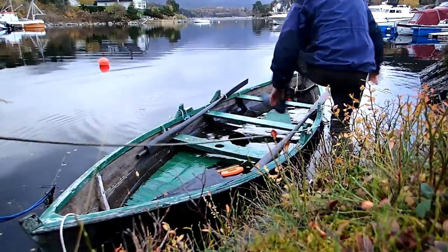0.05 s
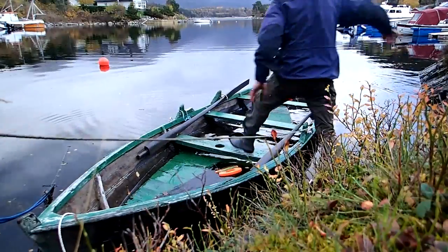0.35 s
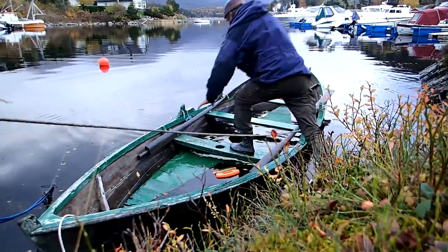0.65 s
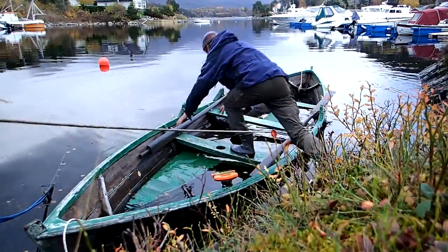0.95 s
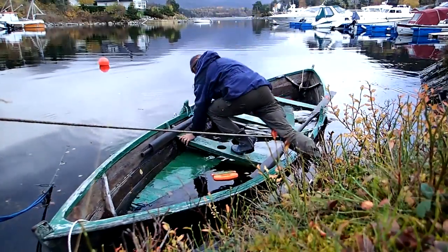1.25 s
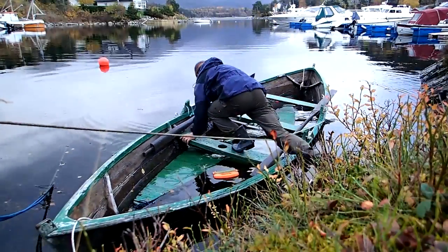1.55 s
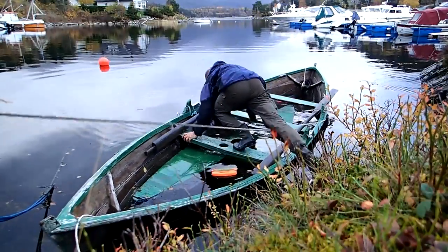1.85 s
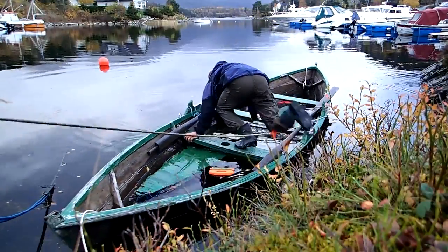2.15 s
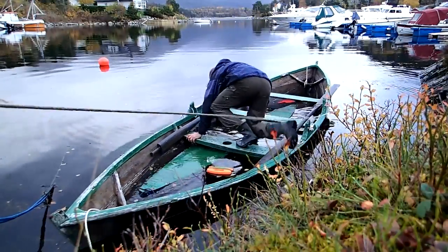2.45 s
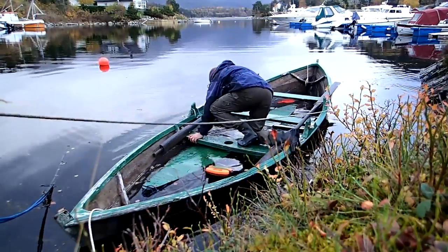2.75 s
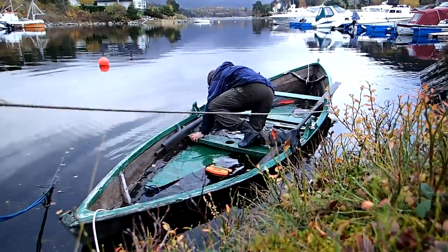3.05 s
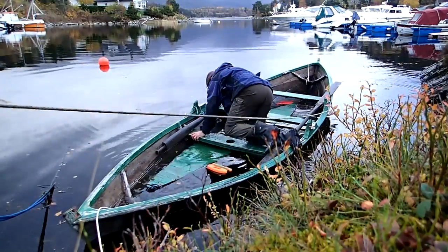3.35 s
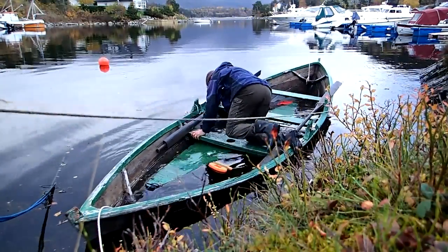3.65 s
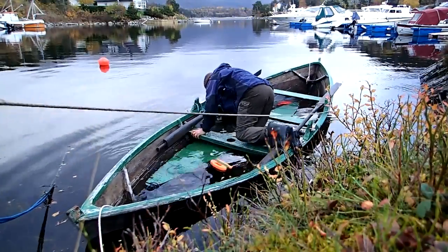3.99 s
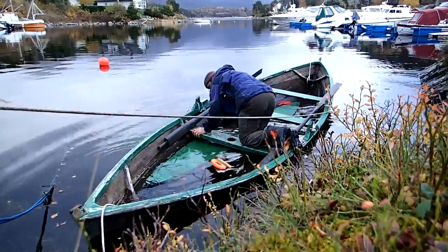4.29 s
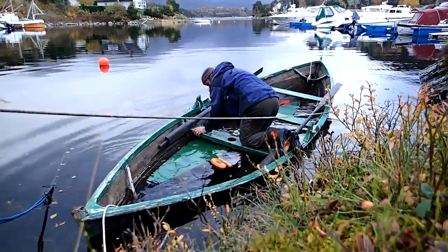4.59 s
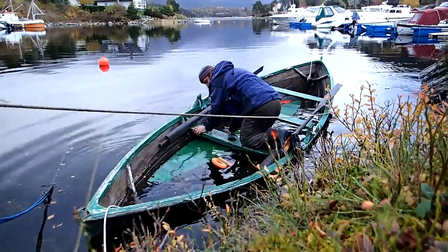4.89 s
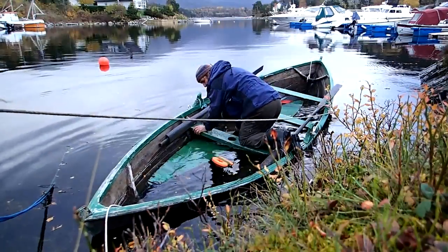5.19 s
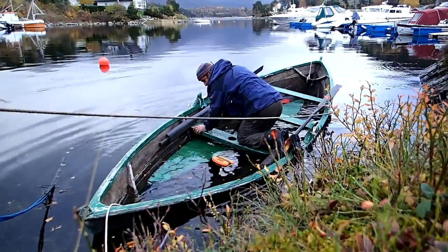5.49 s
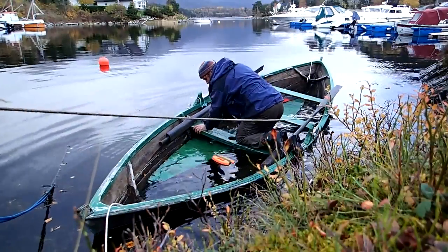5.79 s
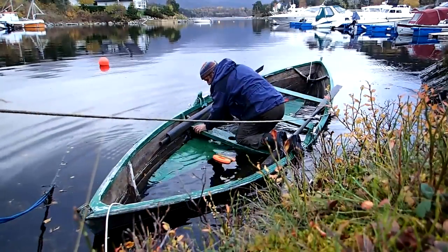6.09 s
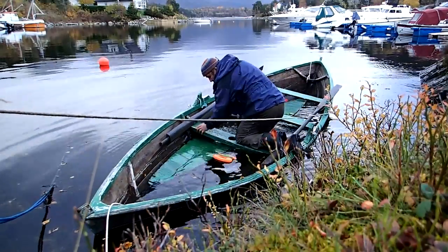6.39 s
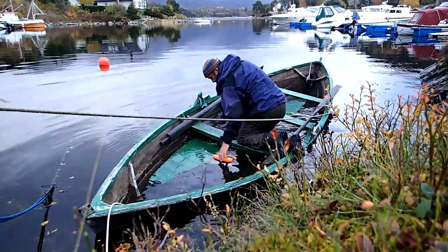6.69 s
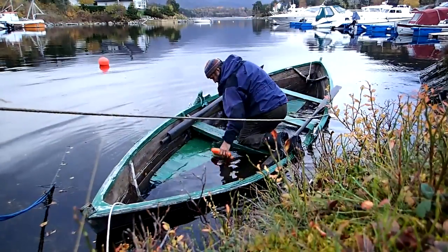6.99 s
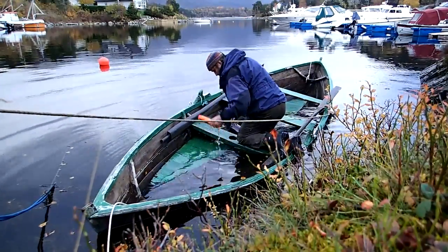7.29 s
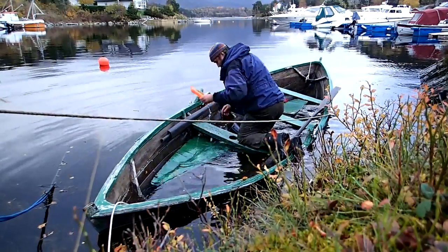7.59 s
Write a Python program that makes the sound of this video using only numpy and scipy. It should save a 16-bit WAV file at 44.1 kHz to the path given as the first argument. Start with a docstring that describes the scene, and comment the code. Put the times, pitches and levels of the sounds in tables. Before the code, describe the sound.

Someone climbs into a small wooden boat on calm water. Boots thump hollowly on the planks while a jacket and grass rustle, and water briefly splashes. More knocks, rubs and short rubber squeaks lead to one heavy, rattling thump. Water then sloshes and gurgles in the bottom of the boat, and a bailer scoops it up with splashes and drips. The sounds are fairly close, outdoors, over light wind.

```python
"""On calm water by a grassy bank, someone climbs into a small wooden boat and kneels on a seat.
Boots and knees thump the planks and make them ring; rubber soles rub and squeak; jacket and grass
rustle. The rocking sloshes the water in the bottom of the boat, where trapped bubbles ring and
gurgle, then a bailer scoops it up and drips. Light wind, a far hush and a faint whistle lie behind."""
import sys
import numpy as np
from scipy import signal
from scipy.fft import rfft, irfft, next_fast_len
from scipy.io import wavfile
from scipy.ndimage import uniform_filter1d

SR = 44100
rng = np.random.default_rng(int(sys.argv[2]) if len(sys.argv) > 2 else 0)


def bounce(signal):
    """Save signal as a 16-bit WAV file at the path given by the first command-line argument."""
    frames = np.transpose(np.atleast_2d(signal))
    limited = np.clip(frames, -1, 1)
    pcm = np.round(limited * 32767).astype(np.int16)
    wavfile.write(sys.argv[1], SR, pcm)


N = 341334
TIME = np.arange(N) / SR

# tone of the outdoor hush: pitch_hz, level_db
HUSH_SPECTRUM = [(25, -30), (40, -11.5), (62, -4), (100, 1), (200, 0.5), (400, -4), (900, -7),
                 (1800, -13.5), (3500, -22), (7000, -24.5), (12000, -21.5), (16000, -26.5)]
# how alike the hush is in both ears: pitch_hz, likeness (0 to 1)
HUSH_LIKENESS = [(40, 0.87), (200, 0.28), (700, 0.34), (2500, 0.25), (5000, 0.68), (8000, 0.065),
                 (15000, 0.061)]
# a far, low drone: time_s, level_db
DRONE_LEVELS = [(0.0, -73), (2.0, -76), (4.4, -69), (6.2, -56), (7.74, -59)]
# movements that stir jacket and grass: peak_s, build_s, fade_s, level_db
BODY_MOVES = [(.02, 0.088, 1.0, -52), (.8, 0.7, 0.54, -51.5), (1.25, 0.38, 0.3, -59.5),
              (1.62, 0.62, 0.41, -53.5), (1.82, 0.27, 0.17, -54.5), (2.68, 0.17, 0.22, -50),
              (3.12, 0.17, 0.21, -58.5), (3.45, 0.5, 0.6, -56.5), (4.0, 0.77, 0.43, -64),
              (4.63, 0.09, 0.28, -60), (5.3, 0.16, 0.69, -49.5), (5.82, .3, 0.44, -60),
              (6.62, 0.15, 0.93, -54), (7.4, 0.79, 1.4, -55)]
# tone of the rustle: pitch_hz, level_db
RUSTLE_SPECTRUM = [(500, -14), (1200, -5.5), (2500, -0.5), (5000, -3.5), (7500, -11), (11500, -13.5),
                   (15000, -27)]
# brushes of jacket and trousers: start_s, length_s, level_db, lowest_hz
CLOTH_SWISHES = [(.005, 0.051, -51, 1500), (2.09, 0.38, -58.5, 3400), (2.66, 0.064, -48.5, 3870),
                 (2.72, 0.033, -51.5, 3870), (3.515, .04, -51.5, 2980), (4.11, 0.031, -51, 3500),
                 (4.705, 0.043, -59, 2500)]
# blows on the hull: start_s, level_db, brightness_hz, settle_s, rebound_count
HULL_BLOWS = [(.008, -32, 1660, 0.048, 0), (0.034, -25, 285, 0.089, 0), (.096, -30, 261, .11, 0),
              (.182, -35.5, 330, 0.16, 1), (.327, -42.5, 2010, 0.035, 0), (0.76, -37, 352, 0.22, 0),
              (0.833, -32.5, 237, 0.16, 0), (1.325, -45, 300, .33, 0), (2.377, -39, 1800, 0.09, 0),
              (2.545, -41, 905, 0.12, 3), (2.928, -36, 646, 0.12, 0), (3.05, -45, 306, 0.048, 0),
              (3.352, -21.5, 3460, 0.078, 0), (3.357, -20, 1900, 0.079, 0), (3.368, -26, 465, 0.23, 3),
              (4.893, -44.5, 300, 0.033, 0)]
# notes the planks ring at: pitch_hz, width_hz, level_db
PLANK_RESONANCES = [(149, 35, 0.5), (202.8, 14.3, 2.5), (275, 67, -1), (390, 74, -5), (465, 35, -2.5),
                    (603, 98, -9.5), (806, 310, -10.5), (1060, 150, -6), (1226, 210, -8.5), (1666, 46, -9),
                    (1826, 140, -12.5), (2530, 1900, -20)]
# boots and hands rubbing on wood: start_s, length_s, level_db, scratch_db (compared with the rub)
WOOD_RUBS = [(0.041, 0.005, -29.5, -10.5), (2.426, 0.084, -46, -5.5), (2.566, 0.083, -49.5, -3),
             (2.927, 0.048, -49, 17), (3.091, 0.026, -47, -1), (4.515, 0.037, -47.5, -12),
             (4.543, 0.043, -44, -11), (4.667, 0.047, -34.5, -25), (4.708, 0.048, -43.5, -6)]
# notes the seat rings at: pitch_hz, width_hz, level_db
SEAT_RESONANCES = [(500, 340, -5.5), (590, 148, 3.5), (840, 66, 4), (1010, 67, 2), (1300, 50, -4.5),
                   (1790, 290, -10.5), (2310, 180, -26)]
# ticks of drops and stems: start_s, crack_db, ring_hz, ring_db (compared with the crack)
SHARP_TICKS = [(.5002, -62, 2750, 16), (.8768, -57.5, 3730, 3.5), (.9352, -55.5, 3600, 6),
               (1.064, -58, 3950, 7.5), (1.221, -58, 2150, -3), (1.398, -69, 1590, 29),
               (1.44, -63, 3730, 8), (1.492, -48, 1520, 4), (1.509, -48, 3970, 4.5),
               (1.5912, -51, 2700, -1), (1.6126, -49, 3500, -14), (3.5208, -61, 3840, 6),
               (3.851, -65.5, 2780, 16), (4.205, -55, 2760, -37), (4.9182, -63, 1380, -5),
               (5.3037, -57.5, 2040, 9.5), (5.5741, -59, 1970, 7), (5.6485, -56.5, 3400, -2),
               (6.1861, -59, 2640, 9.5), (6.2077, -52, 1650, -2), (6.5903, -55.5, 1520, 4),
               (6.6786, -54.5, 3120, -2), (6.85, -68.5, 1890, 21), (6.9675, -66.5, 2250, 20.5),
               (7.2632, -60.5, 3140, 17), (7.375, -50, 1760, -3), (7.445, -47.5, 2550, 0.5),
               (7.4841, -51, 3590, 5), (7.5472, -56.5, 3600, 7), (7.604, -56.5, 3100, 11.5),
               (7.6662, -52, 3000, 1.5), (7.6963, -42, 2300, 0)]
# a thin whistle far away: start_s, length_s, level_db
WHISTLE_SWELLS = [(.55, 0.99, -65), (3.05, 1, -64)]
# the loudest bubbles and tinkling drops: start_s, pitch_hz, level_db
LOUD_BUBBLES = [(1.417, 940, -36.5), (1.487, 940, -29.5), (1.709, 2120, -34), (5.155, 837, -37.5),
                (5.445, 1126, -35.5), (5.608, 613, -32), (5.61, 270, -28), (5.708, 837, -33),
                (5.787, 902, -28), (5.895, 995, -34), (5.93, 2000, -34.5), (6.012, 800, -33.5),
                (6.198, 1490, -32), (6.232, 1940, -34), (6.252, 236, -26), (6.258, 788, -34),
                (6.287, 2240, -31.5), (6.543, 850, -27.5), (6.605, 300, -29.5), (6.715, 2200, -32.5),
                (7.062, 11700, -33), (7.091, 12100, -27), (7.424, 306, -28)]
# surges as the boat rocks and the bailer scoops: peak_s, build_s, fade_s, bubbling_db, spray_db
WATER_SURGES = [(1.5, 0.04, .2, -48, -54), (1.58, 0.17, 0.32, -42.5, -55), (1.71, 0.047, 1, -50, -53.5),
                (5.31, 0.26, 1, -46.5, -56.5), (5.62, .15, 0.13, -47.5, -69), (5.81, 0.31, 0.2, -45.5, -51),
                (6.04, 0.16, 0.095, -44, -56.5), (6.259, .15, 0.074, -41, -46.5),
                (6.535, .05, 0.12, -40.5, -52), (6.72, 0.053, 0.076, -43, -51.5),
                (6.86, 0.046, .2, -49, -52), (6.97, .12, 0.57, -57, -49), (7.11, 0.05, 0.23, -48, -55),
                (7.28, 0.038, 0.31, -49.5, -47.5), (7.43, 0.12, 0.59, -58, -51.5),
                (7.7, .05, 0.24, -52, -50)]
# how loud a bubble is at each pitch: pitch_hz, level_db
BUBBLE_LEVELS = [(220, 7.5), (500, -4), (900, 6), (1800, 5), (3000, 4.5), (5000, -7.5)]
# the same for the tiny bubbles of the spray: pitch_hz, level_db
SPRAY_LEVELS = [(2500, -6), (4000, 5.5), (6500, 0.5), (9500, -3), (12400, 8), (15000, -38)]
# tone of the water's fizz: pitch_hz, level_db
FIZZ_SPECTRUM = [(300, 6), (900, -11), (2500, 5.5), (5000, -1.5), (8000, -7), (12500, -4.5), (15000, -15)]
# short noisy bursts (slaps of water, and a swish just before the heavy thump):
# start_s, length_s, level_db, lowest_hz
NOISY_BURSTS = [(1.485, 0.03, -40.5, 900), (1.612, 0.013, -46, 2500), (3.345, 0.027, -42.5, 2360),
                (5.24, 0.054, -52, 1500), (5.303, 0.016, -43.5, 1790), (6.227, 0.019, -45.5, 1500),
                (6.243, 0.042, -43.5, 218), (6.51, .05, -45, 400), (6.995, 0.091, -52, 2200),
                (7.093, 0.032, -43, 1500), (7.252, 0.023, -43, 1990), (7.523, .022, -42.5, 1800)]
# wet rubber squeaks, one list of points each: time_s, pitch_hz, level_db
SQUEAK_PATHS = [
    [(2.07, 936, -52), (2.11, 1120, -51), (2.16, 2180, -58)],
    [(3.38, 1050, -46), (3.395, 1490, -43), (3.408, 1770, -45), (3.424, 2150, -58)],
]
# pitches the microphone boosts or weakens: pitch_hz, width_hz, gain_db
MICROPHONE_BANDS = [(4043, 107, -18.5), (4940, 1290, 13.5), (6290, 125, 5), (12600, 700, -3)]


def from_db(db):
    """Turn decibels into a number to multiply by."""
    return 10 ** (np.asarray(db) / 20)


def rms_one(x):
    """Scale a sound so that its average strength (rms) is 1."""
    return x / np.sqrt(np.mean(x ** 2) + 1e-20)


def in_time(rows):
    """Join timed points with straight lines, one curve per column."""
    times, *columns = np.transpose(rows)
    return [np.interp(TIME, times, column) for column in columns]


def at_hz(points, hz):
    """Read a table between its listed pitches."""
    pitches, values = np.transpose(points)
    return np.interp(np.log(hz + 1e-9), np.log(pitches), values)


def coloured(x, spectrum):
    """Give a steady sound a tone, at strength 1."""
    size = next_fast_len(N)
    gains = from_db(at_hz(spectrum, np.fft.rfftfreq(size, 1 / SR)))
    return rms_one(irfft(rfft(x, size) * gains, size)[..., :N])


def keep_side(x, hz, side, order=2):
    """Keep the "low" or "high" side of a pitch."""
    return signal.lfilter(*signal.butter(order, min(hz, SR / 2 - 1), side, fs=SR), x)


def resonate(x, resonances):
    """Make a sound ring at several pitches, added with alternating signs."""
    out = 0
    for k, (hz, width, db) in enumerate(resonances):
        r = np.exp(-np.pi * width / SR)
        ring = signal.lfilter([1, 0, -1], [1, -2 * r * np.cos(2 * np.pi * hz / SR), r * r], x)
        out = out + (-1) ** k * from_db(db) * (1 - r * r) / 2 * ring
    return out


def drift(per_s):
    """A random wander of strength 1."""
    points = rng.standard_normal(4096)
    return rms_one(np.interp(TIME * per_s, np.arange(len(points)), points))


def dying(t, fade_s):
    """A fade that drops 60 dB every fade_s."""
    return np.exp(-np.log(1000) * t / fade_s)


def stroke(t, length):
    """A swell that rises fast and falls slowly."""
    return np.sin(np.pi * np.sqrt(np.clip(t / length, 0, 1)))


def swells(peaks, builds, fades, levels_db):
    """A loudness curve: each swell rises 20 dB in its build time and drops 20 dB in its fade time."""
    power, t = 1e-12, TIME[::32]
    for peak, build, fade, db in zip(peaks, builds, fades, levels_db):
        away = np.minimum(np.maximum((peak - t) / build, (t - peak) / fade), 10)
        power = power + from_db(db - 20 * away) ** 2
    return np.interp(TIME, t, np.sqrt(power))


def add(out, start_s, sound):
    """Mix a sound in at its start time."""
    i = int(np.clip(start_s * SR, 0, N - 1))
    out[i:i + len(sound)] += sound[:N - i]


def even_out(x, samples):
    """Hold a sound's running level steady."""
    return x / np.sqrt(np.abs(uniform_filter1d(x ** 2, size=samples)) + 1e-6)


def crackle(spectrum, per_s, spread_db, flutter_db):
    """Tiny random clicks in nine pitch bands; each band flickers by itself."""
    out = 0
    for hz in np.geomspace(400, 14000, num=9):
        sizes = from_db(spread_db * np.minimum(rng.exponential(1, N), 4)) * rng.choice([-1, 1], N)
        clicks = even_out(sizes * (rng.random(N) < per_s / SR), samples=4000)
        band = rms_one(resonate(clicks, [(hz, hz / 2, 0)]))
        out = out + np.sqrt(hz) * band * from_db(flutter_db * drift(60))
    return coloured(out, spectrum)


def bursts(rows, roughness_db, top_hz):
    """Short swells of grainy noise."""
    out, t = np.zeros(N), TIME[:SR // 3]
    for start, length, db, low_hz in rows:
        sizes = from_db(roughness_db * np.clip(rng.standard_normal(len(t)), -2, 2))
        burst = rng.standard_normal(len(t)) * sizes * stroke(t, length)
        sound = keep_side(keep_side(burst, low_hz, "high"), top_hz, "low", order=1)
        add(out, start, from_db(db) * sound / np.sqrt(np.sum(sound ** 2) / (length * SR)))
    return out


def air(breeze_db=-50, gust_db=0.45, hiss_db=-49):
    """A wide outdoor hush, whose low part moves with the breeze, over a far drone."""
    hz = np.geomspace(20, SR / 2, num=60)
    alike, colour = np.clip(at_hz(HUSH_LIKENESS, hz), 0, .99), at_hz(HUSH_SPECTRUM, hz)
    # both ears share "mid"; "side" is added to one ear and taken from the other
    mid_db, side_db = colour + 10 * np.log10(1 + alike), colour + 10 * np.log10(1 - alike)
    width = np.sqrt(np.sum(hz * from_db(side_db) ** 2) / np.sum(hz * from_db(mid_db) ** 2))
    mid, side = (coloured(rng.standard_normal(N), np.c_[hz, db]) for db in (mid_db, side_db))
    hush = mid + width * side * np.array([[1], [-1]])
    low = keep_side(hush, 3500, "low", order=1)
    breeze = low * from_db(breeze_db + gust_db * drift(per_s=13))
    drone = rms_one(keep_side(resonate(rng.standard_normal(N), [(63, 6.4, 0)]), 180, "low"))
    return breeze + from_db(hiss_db) * (hush - low) + from_db(in_time(DRONE_LEVELS)[0]) * drone


def rustle():
    """Cloth and dry stems give dense, tiny crackles with each movement."""
    movement = swells(*np.transpose(BODY_MOVES))
    return movement * crackle(RUSTLE_SPECTRUM, per_s=3000, spread_db=5, flutter_db=3.5)


def swishes():
    """Cloth slides over cloth with a short, fine hiss."""
    return bursts(CLOTH_SWISHES, roughness_db=3, top_hz=4500)


def blows(gap_s=.037, first_drop_db=4, next_drop_db=.7):
    """List each blow and its rebounds: loose boards bounce at an even pace, weaker each time."""
    for start, db, bright_hz, settle_s, rebounds in HULL_BLOWS:
        yield start, db, bright_hz, settle_s
        for k in range(round(rebounds)):
            yield start + (k + 1) * gap_s, db - first_drop_db - k * next_drop_db, bright_hz, settle_s


def knocks():
    """Each blow is a push, then loose boards and oars chatter on the ringing planks."""
    out, t = np.zeros(N), TIME[:SR // 2]
    for start, db, bright_hz, settle_s in blows():
        force = 0.22 * rng.standard_normal(len(t)) * dying(t, settle_s)
        force[0] += 2.2  # the push
        softened = keep_side(force, bright_hz, "low") + 5e-6 * bright_hz * force
        sound = keep_side(resonate(softened, PLANK_RESONANCES), 89, "high", order=4)
        loudest = np.sqrt(uniform_filter1d(sound ** 2, size=660).max())
        add(out, start, from_db(db) * sound / loudest)
    return out


def rubs(slips_per_s=110.4, grit=1.15):
    """Rubber sticks and slips unevenly on the seat, with sand scratching under it."""
    out, t = np.zeros(N), TIME[:SR // 5]
    for start, length, db, scratch_db in WOOD_RUBS:
        slips = np.cumsum(slips_per_s * (1 + 7 * rng.standard_normal(len(t)))) / SR
        force = dying(slips % 1, 6.0) * (1 + grit * rng.standard_normal(len(t))) * stroke(t, length)
        scratch = keep_side(keep_side(force, 1540, "high"), 2400, "low", order=3)
        seat = keep_side(resonate(force, SEAT_RESONANCES), 290, "high")
        sound = rms_one(seat) + from_db(scratch_db) * rms_one(scratch)
        add(out, start, from_db(db) * sound / np.sqrt(np.sum(sound ** 2) / (length * SR)))
    return out


def drips(spray, per_s=20, idle_db=-62, low_hz=1525, high_hz=3700):
    """List stray drops as ticks: they follow the spray's level, and the wet hull drips faintly on."""
    when, size, pitch, ring = rng.random((400, 4))[:int(per_s * N / SR)].T
    spray_db = 20 * np.log10(spray[(when * N).astype(int)] + from_db(idle_db))
    crack_db = spray_db - 14.5 + 4 * (2 * size - 1)
    ring_hz = low_hz * (high_hz / low_hz) ** pitch
    ring_db = 8.5 + 4 * (2 * ring - 1)
    return list(zip(when * N / SR, crack_db, ring_hz, ring_db))


def ticks(rows, rise_s=0.0022, fade_s=0.011, spatter_s=0.094):
    """A drop or stem cracks and faintly spatters, with a brief ring below and a fine snap above."""
    out, t = np.zeros(N), TIME[:SR // 16]
    impact = (dying(t, fade_s) + 0.14 * dying(t, spatter_s)) * (1 - dying(t, rise_s))
    for (start, db, hz, ring_db), signs in zip(rows, rng.choice([-1, 1], (len(rows), len(t)))):
        noise = signs * impact
        crack = rms_one(keep_side(keep_side(noise, 5370, "high", order=4), 4510, "low", order=6))
        tone = 3 * np.sin(2 * np.pi * hz * t) * dying(t, .03)
        body = rms_one(keep_side(resonate(noise, [(hz, 1300, 0)]), 3840, "low"))
        ring = rms_one(body + tone)
        snap = rms_one(keep_side(keep_side(noise, 15000, "high"), 12000, "low", order=4))
        snap_db = -7 - 0.29 * ring_db  # the more ring, the less snap
        add(out, start, from_db(db) * (crack + from_db(ring_db) * ring + from_db(snap_db) * snap))
    return out


def whistle(pitch_hz=3520, width_hz=140):
    """A thin, unsteady tone far away swells and fades."""
    band = [(pitch_hz, width_hz, 0)]
    tone = rms_one(resonate(resonate(rng.standard_normal(N), band), band))
    return tone * sum(from_db(db) * stroke(TIME - start, length) for start, length, db in WHISTLE_SWELLS)


def bubble(hz, fade_s, rise):
    """A bubble rings and climbs in pitch as it nears the surface."""
    t = TIME[:int(fade_s * SR) + 2]
    tone = np.sin(2 * np.pi * hz * t * (1 + rise * t / fade_s / 2))
    return tone * dying(t, fade_s) * (1 - np.exp(-t * hz))


def plops():
    """Single bubbles stand out of the sloshing; big, low ones ring longest."""
    out = np.zeros(N)
    for start, hz, db in LOUD_BUBBLES:
        add(out, start, from_db(db) * bubble(hz, fade_s=0.054 * (hz / 1000) ** -0.23, rise=0.31))
    return out


def bubbling(levels, cycles_at_1khz, count, spread_db=5):
    """A steady swarm of bubbles of every size; the small, high ones die soonest."""
    out, low_hz, high_hz = np.zeros(N), levels[0][0], levels[-1][0]
    for when, pitch, life, softness in rng.random((count, 4)):
        hz = low_hz * (high_hz / low_hz) ** (pitch ** 0.806)
        db = at_hz(levels, hz) - spread_db * np.log(softness + .04)
        fade_s = cycles_at_1khz * (.5 + life) / np.sqrt(hz * 1000)
        add(out, when * N / SR, from_db(db) * bubble(hz, fade_s, rise=300 / (hz + 700)))
    return even_out(out, samples=2600)


def slosh(churn, spray, fizz_db=-7.5):
    """Each surge of water traps bubbles and throws tinkling spray over a fine fizz."""
    swarm = bubbling(BUBBLE_LEVELS, cycles_at_1khz=22.5, count=8000)
    tinkle = bubbling(SPRAY_LEVELS, cycles_at_1khz=42, count=6500)
    fizz = crackle(FIZZ_SPECTRUM, per_s=1000, spread_db=4.5, flutter_db=4)
    return churn * swarm + spray * (tinkle + from_db(fizz_db) * fizz)


def slaps_and_swish():
    """Short, coarse bursts of noise: slaps of water, and a swish just before the heavy thump."""
    return bursts(NOISY_BURSTS, roughness_db=-4.5, top_hz=3060)


def glide(path, waver):
    """A wavering tone follows points of time_s, pitch_hz, level_db."""
    hz, db = in_time(path)
    sounding = (TIME > path[0][0]) & (TIME < path[-1][0])
    level = sounding * from_db(db + 0.68 * drift(150))
    wavering_hz = hz * (1 + waver * drift(200))
    return level * np.sin(2 * np.pi * np.cumsum(wavering_hz) / SR)


def squeaks():
    """Wet rubber slides on the seat with a rising squeak."""
    return sum(glide(path, waver=0.011) for path in SQUEAK_PATHS)


def gurgle(start_s=5.497, gone_s=5.815, start_hz=223.3, glugs_per_s=11.24):
    """An air pocket squeezed under the boards glugs, and its pitch soars as it shrinks."""
    air_left = np.linspace(1, .03, num=80)
    age = (1 - air_left) * (gone_s - start_s)
    hz = start_hz / air_left ** .55
    db = -45 + 7 * np.sin(2 * np.pi * glugs_per_s * age)
    return glide(np.c_[start_s + age, hz, db], waver=0.046)


def echoes(x, fade_s, echo_db):
    """Add the brief scatter from hull and bank, different at each ear."""
    t = TIME[:SR // 3]
    tails = rng.standard_normal((2, len(t))) * dying(t, fade_s) * (t > .001)
    tails /= np.sqrt(np.sum(tails ** 2, axis=1, keepdims=True))
    return x + from_db(echo_db) * signal.fftconvolve(x[None], tails, axes=1)[:, :N]


def scene():
    """Wood, water and cloth in the open air."""
    peak, build, fade, bubbling_db, spray_db = np.transpose(WATER_SURGES)
    churn, spray = swells(peak, build, fade, bubbling_db), swells(peak, build, fade, spray_db)
    wood = knocks() + rubs() + squeaks()
    water_and_swish = slosh(churn, spray) + slaps_and_swish() + plops() + gurgle()
    cloth = swishes() + rustle()
    far = air() + whistle()
    drops_and_stems = ticks(SHARP_TICKS + drips(spray))
    return (far + echoes(wood, fade_s=0.076, echo_db=-30)
            + echoes(water_and_swish + cloth + drops_and_stems, fade_s=0.15, echo_db=-17.5))


def record(dry, top_hz=15800):
    """The small microphone's opening rings in the treble; the very top is cut."""
    out = dry
    for hz, width, db in MICROPHONE_BANDS:
        angle, gain = 2 * np.pi * hz / SR, np.sqrt(from_db(db))
        damping = np.sin(angle) * width / hz / 2 * np.array([1, 0, -1])
        ring = np.array([1, -2 * np.cos(angle), 1])
        out = signal.lfilter(ring + damping * gain, ring + damping / gain, out)
    return signal.sosfilt(signal.ellip(10, .1, 70, top_hz, fs=SR, output="sos"), out)


dry = scene()
out = record(dry)
bounce(out)
```